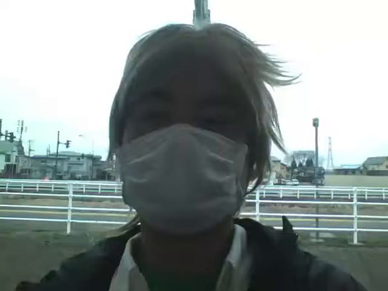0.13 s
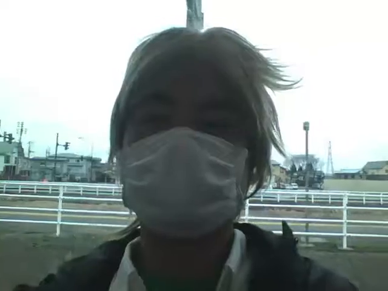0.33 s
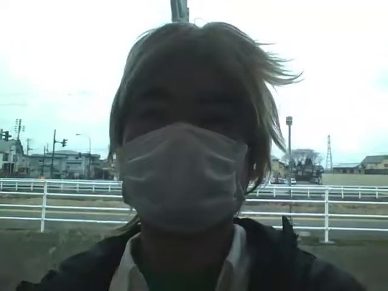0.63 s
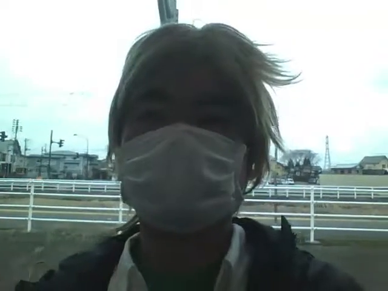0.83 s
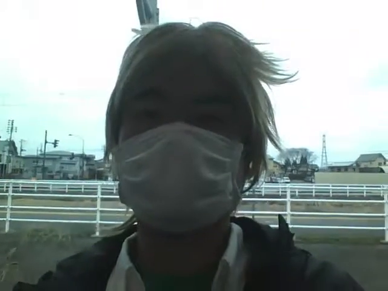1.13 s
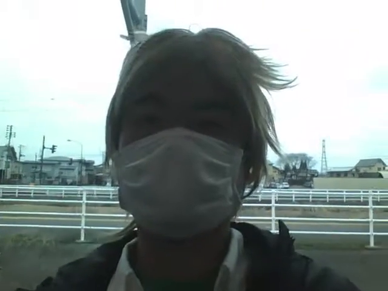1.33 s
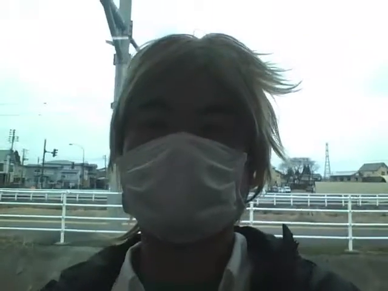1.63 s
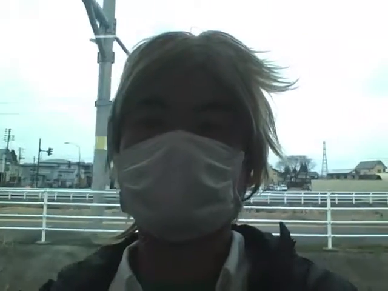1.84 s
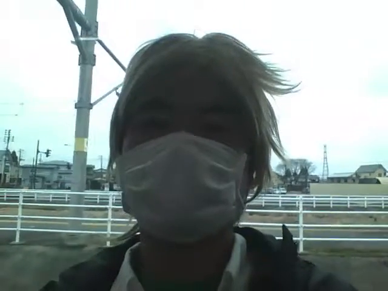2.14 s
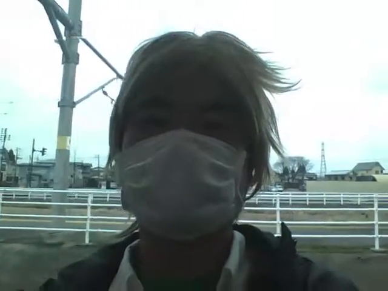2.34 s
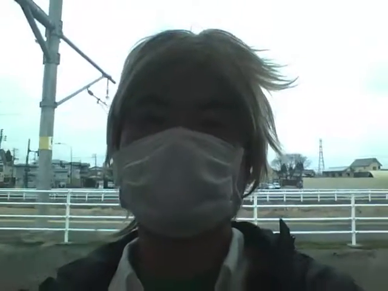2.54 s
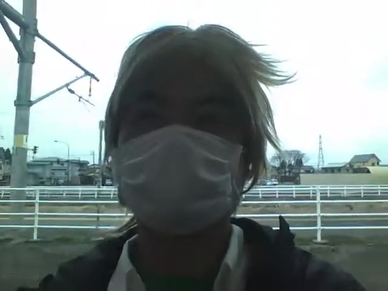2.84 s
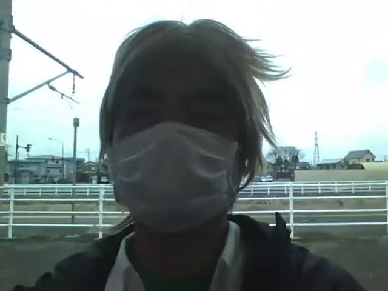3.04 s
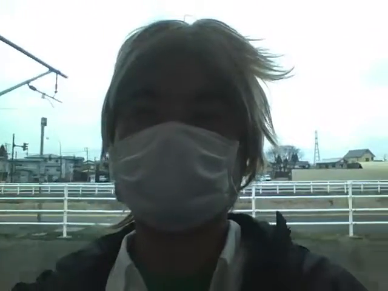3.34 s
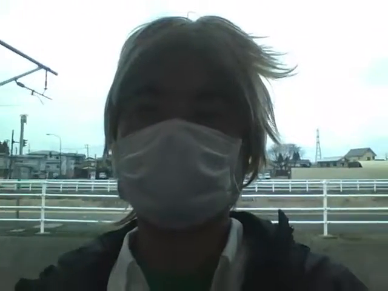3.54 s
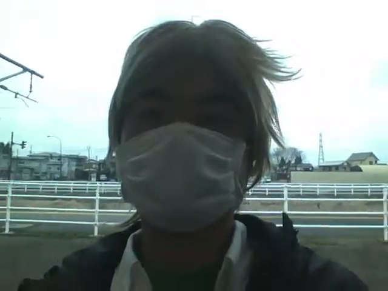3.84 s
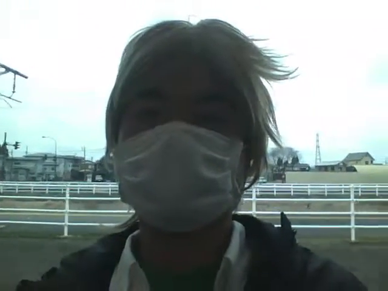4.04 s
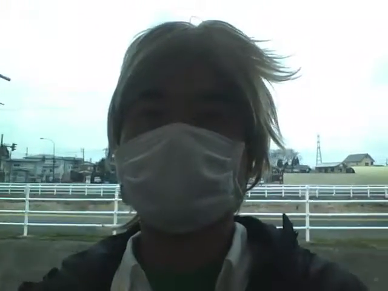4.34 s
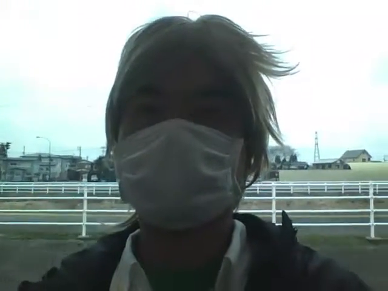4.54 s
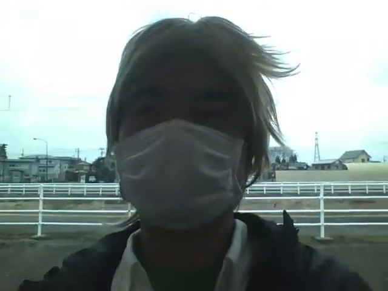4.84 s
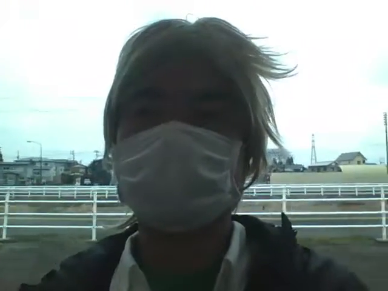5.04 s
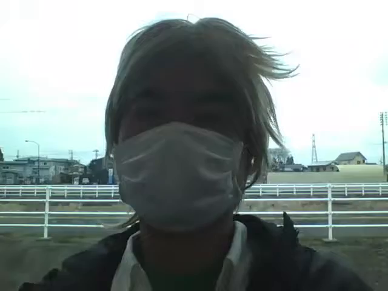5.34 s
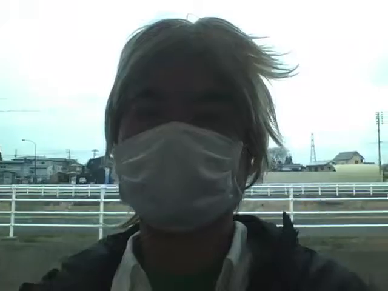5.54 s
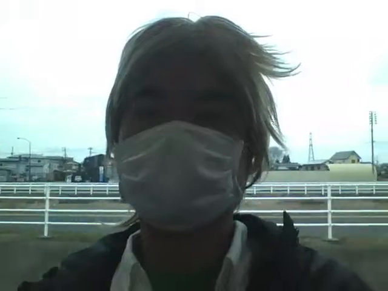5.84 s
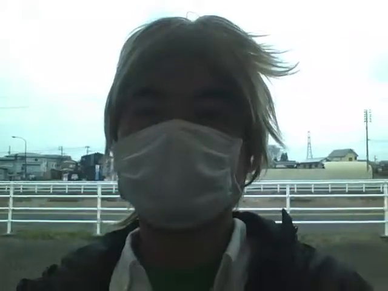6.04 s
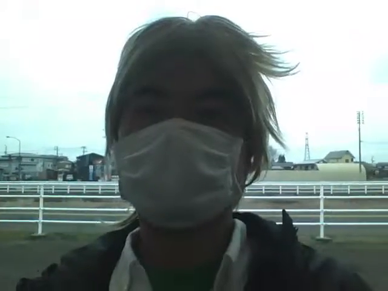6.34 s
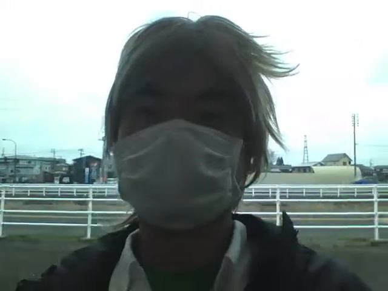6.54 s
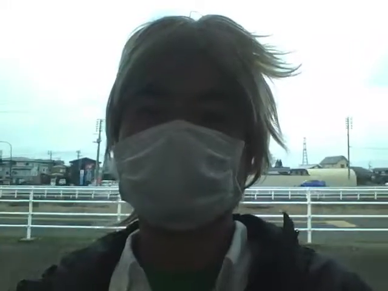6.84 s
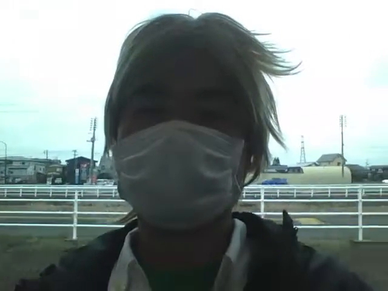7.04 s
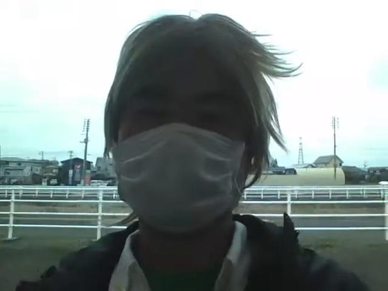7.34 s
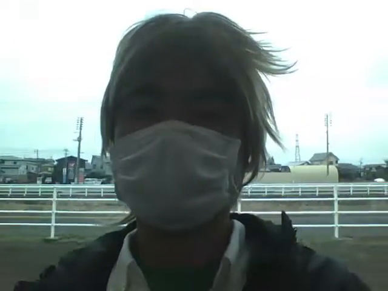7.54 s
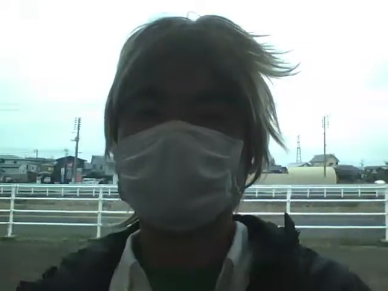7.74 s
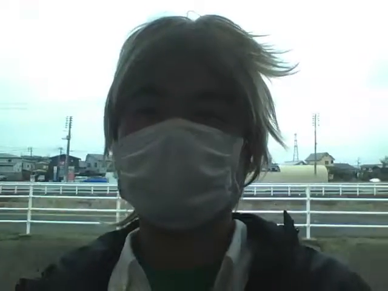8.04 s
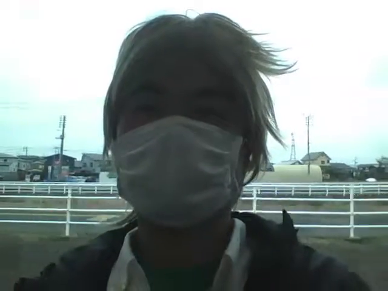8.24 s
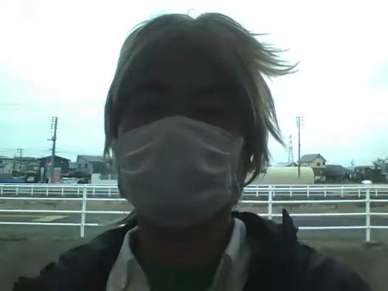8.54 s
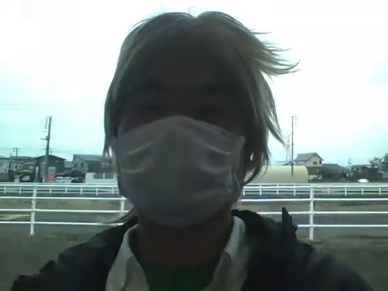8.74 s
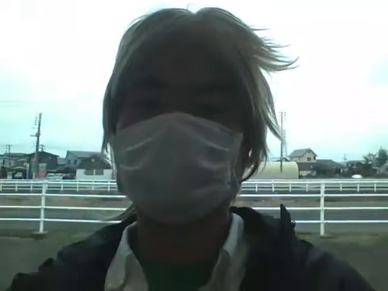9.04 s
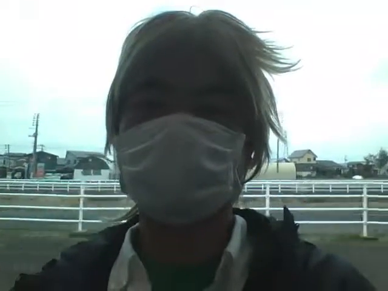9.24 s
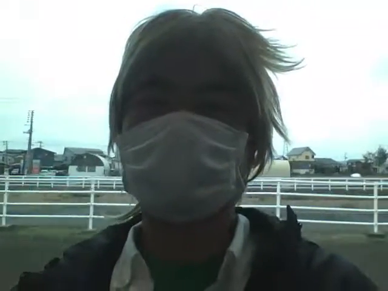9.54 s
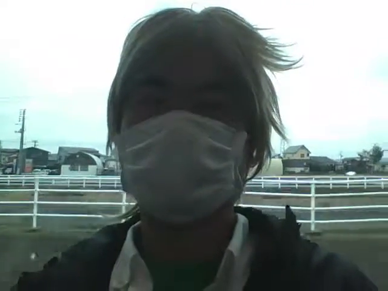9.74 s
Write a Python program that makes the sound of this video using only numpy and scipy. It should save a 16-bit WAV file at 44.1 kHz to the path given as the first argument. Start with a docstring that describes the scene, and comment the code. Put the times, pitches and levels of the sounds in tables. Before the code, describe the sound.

A steady, low, many-toned hum fills a train carriage, heard from inside with soft ventilation hiss. Early on, something small clicks twice beside the microphone, followed by faint ticks and rubs. The hum holds its pitch but turns slightly brighter, with a thin wavering whine, as the wheels rumble louder under the floor. Later the track gives several muffled thuds.

```python
"""Inside a diesel railcar under power, microphone in the cabin. Air hisses evenly in the background.
Wheel rumble swells from below, with a few dull knocks from the track, and something small clicks and
brushes close to the microphone. Over it all the governed engine holds one speed, so its drone is a comb
of steady tones; a thin whine beats slowly against one of them."""
import sys
import numpy as np
from scipy import signal
from scipy.fft import rfft, irfft, next_fast_len
from scipy.io import wavfile

SR = 44100
rng = np.random.default_rng(int(sys.argv[2]) if len(sys.argv) > 2 else 0)


def wrap_up_sound(samples):
    """Save the sound to the file named by the first command line argument, as 16-bit audio."""
    columns = np.atleast_2d(samples).T
    # keep every value between -1 and 1, then stretch to whole-number steps
    tamed = np.clip(columns, -1, 1)
    steps = np.round(tamed * 32767).astype(np.int16)
    wavfile.write(sys.argv[1], SR, steps)


N = 436149
TIME = np.arange(N) / SR

CRANK_HZ, WHINE_HZ = 27.99315, 1600.1
# engine tones that stand out, each on the nearest crank harmonic: (frequency [Hz], level [dB])
ENGINE_TONES = [(112, -25), (252, -27.5), (280, -32.5), (308, -30), (420, -38), (504, -38.5), (560, -40.5),
                (616, -39), (672, -39), (728, -31.5), (812, -45.5), (980, -49.5), (1064, -56), (1148, -47),
                (1204, -48), (1596, -51), (1764, -53.5), (2156, -59), (2296, -55.5)]
# the weaker comb between them, in bass, middle and treble: (frequency [Hz], level per tone [dB])
LOW_COMB = [(28, -40.5), (56, -47), (84, -52), (140, -40.5), (196, -42), (224, -38), (336, -41),
            (364, -53.5), (392, -44), (448, -52.5), (476, -45.5), (640, -49), (756, -54.5), (870, -53)]
MID_COMB = [(900, -62.5), (1300, -61), (1750, -61), (2050, -66), (2450, -66.5), (2720, -69), (2850, -69.5),
            (3200, -71), (3600, -76), (4000, -75.5), (4400, -84), (4750, -73.5), (5500, -81), (7100, -88)]
TOP_COMB = [(8000, -102), (9000, -94.5), (11200, -91), (12000, -96), (13600, -92.5), (14800, -93)]
# cabin resonances that lift the weaker tones: (frequency [Hz], width [Hz], lift [dB])
CABIN_RESONANCES = [(1275, 63, 9), (1431, 43, 6), (1512, 14, 7.5), (1832, 31, 8.5), (2456, 49, 7.5),
                    (2632, 18, 8.5), (3210, 50, 4), (3380, 33, 5.5), (4790, 40, 3.5)]
# crank harmonics that grow with the load, and by how much
SWELLING_HARMONICS, SWELL_DB = (17, 23, 26, 29, 63, 82), 4.5
# wheel rumble at final speed: (frequency [Hz], relative density [dB])
RUMBLE_SPECTRUM = [(20, -2), (38, 1), (55, -6), (110, 0), (200, -2), (260, -5.5), (340, -9), (430, -15),
                   (700, -17), (1000, -30), (2400, -27), (4000, -47)]
# air and engine hiss in the cabin, and its top end: (frequency [Hz], relative density [dB])
HISS_SPECTRUM = [(25, 7), (80, 4.5), (118, 15), (150, -0.5), (400, 0.5), (690, -1.5), (950, -7),
                 (1600, -6.5), (2100, -11.5), (3200, -10), (4400, -16.5), (4800, -14), (6000, -19),
                 (7100, -27.5)]
TOP_HISS_SPECTRUM = [(6500, -23), (8000, -14), (9000, -3.5), (10200, -1), (11300, 1.5), (11600, -4),
                     (14800, -9)]
# knocks from the track: (time [s], level [dB], pitch [Hz], half-width [s])
TRACK_KNOCKS = [(6.17, -34, 35.8, .035), (6.38, -38, 307, .03), (6.38, -33, 32, .05),
                (6.85, -27, 305, 0.022), (7.08, -38, 36, .035), (9.21, -31, 29.9, .06)]
# clicks close to the microphone: (time [s], level [dB], share of bright ring [0-1])
CLOSE_CLICKS = [(0.494, -29, .2), (.4987, -18, .1), (.5430, -24, .08), (.5446, -24, .03), (1.467, -33, .92),
                (1.5055, -42, .8)]
# their dull and bright modes: (frequency [Hz], level [dB], time to fade 60 dB [s])
DULL_MODES = [(880, -1.5, .012), (2240, -3.5, 0.0075), (3180, -3.5, 0.0068), (4160, -1.5, 0.0045),
              (5100, -13, .005), (12300, -19, .003)]
BRIGHT_MODES = [(5730, 1, 0.0064), (10600, -2, 0.0046)]
# soft rubs close to the microphone: (time [s], level [dB], half-width [s])
CLOSE_RUBS = [(1.445, -53, .015), (1.532, -47.5, .025), (2.48, -53.5, 0.037), (6.88, -53, .035)]
# their colour: (frequency [Hz], relative density [dB])
RUB_SPECTRUM = [(1500, -14), (3000, -3), (5200, 5), (8000, -19), (10800, -8), (14500, -20)]


def from_db(db):
    """Decibels to gain."""
    return 10 ** (np.asarray(db) / 20)


def unit_power(x):
    """Scale to an RMS of 1."""
    return x / np.sqrt(np.mean(x ** 2) + 1e-20)


def at_hz(spectrum, hz):
    """Read a spectrum on a log-frequency axis."""
    knots, level_db = np.transpose(spectrum)
    return np.interp(np.log(hz), np.log(knots), level_db)


def ramp(start_s, length_s):
    """An even rise from 0 to 1 that then holds."""
    return np.clip((TIME - start_s) / length_s, 0, 1)


def swell(at, half_width):
    """A smooth bump in time."""
    return np.exp(-.5 * np.minimum(((TIME - at) / half_width) ** 2, 100))


def hump(hz, centre_hz, width_hz):
    """A smooth bump in frequency, 1 at its centre."""
    return np.exp(-((hz - centre_hz) / width_hz) ** 2)


def drift(rate_hz):
    """Random wander with spread 1."""
    knots = rng.standard_normal(int(N / SR * rate_hz) + 2)
    return unit_power(np.interp(TIME * rate_hz, np.arange(len(knots)), knots))


def band(white, low_hz, high_hz):
    """One band of noise at unit power."""
    band_pass = signal.butter(2, [low_hz, high_hz], "band", fs=SR, output="sos")
    return unit_power(signal.sosfilt(band_pass, white))


def cabin_noise(spectrum, ripple_db=2.5, ripple_hz=45):
    """Unit-power noise of a given colour, rippled by the many resonances of the cabin."""
    size = next_fast_len(N)
    hz = np.maximum(np.arange(size // 2 + 1) * SR / size, 1)
    ripple = np.interp(hz / ripple_hz, np.arange(1024), rng.standard_normal(1024))
    colour = from_db(at_hz(spectrum, hz) + ripple_db * (hz > 800) * ripple)
    low_cut = 1 / (1 + (spectrum[0][0] / 2 / hz) ** 4)
    high_cut = 1 / (1 + (hz / spectrum[-1][0] / 1.05) ** 32)
    shaped = rfft(rng.standard_normal(size)) * colour * low_cut * high_cut
    return unit_power(irfft(shaped, size)[:N])


def ring(contacts, modes):
    """Each contact sets every mode ringing as a dying sine."""
    out = 0
    for k, (hz, level_db, t60) in enumerate(modes):
        decay, step = from_db(-60 / (t60 * SR)), 2 * np.pi * hz / SR
        feedback = [1, -2 * decay * np.cos(step), decay ** 2]
        mode = signal.lfilter([0, np.sin(step)], feedback, contacts + 1e-18)
        out += (-1) ** k * from_db(level_db) * mode
    return out


def air_hiss(turns, throb_db=0.83, firing_db=0.4, flutter_db=0.8):
    """Background hiss that throbs a little with each crank turn and each of its three firings."""
    angle = 2 * np.pi * turns
    pulse_db = throb_db * np.cos(angle) + firing_db * np.cos(3 * angle) + flutter_db * drift(20)
    hiss = from_db(-41) * cabin_noise(HISS_SPECTRUM) + from_db(-64.5) * cabin_noise(TOP_HISS_SPECTRUM)
    return from_db(pulse_db) * hiss


def wheel_rumble(start_speed=0.39, rise_per_s=0.081, final_db=-34.5, doubling_db=11, patchy_db=2.6):
    """Under the floor, rail roughness passes ever faster, so the rumble grows and slides up in pitch."""
    coarse_time = TIME[::441]
    speed = np.minimum(start_speed + rise_per_s * coarse_time, 1)   # share of final speed
    level_db = final_db + doubling_db * np.log2(speed)
    edges = np.geomspace(16, 4096, 17)
    centres = np.sqrt(edges[:-1] * edges[1:])
    power = from_db(at_hz(RUMBLE_SPECTRUM, centres[:, None] / speed)) ** 2 * np.diff(edges)[:, None]
    gains = from_db(level_db) * np.sqrt(power / power.sum(axis=0))
    white, out = rng.standard_normal((2, N)), 0
    for k, gain in enumerate(gains):
        envelope = np.interp(TIME, coarse_time, gain) * from_db(patchy_db * drift(10))
        out += envelope * band(white[k % 2], edges[k], edges[k + 1])
    return out


def track_knocks(wobble=.17):
    """Uneven spots in the track reach the cabin as dull, soft-edged thuds."""
    out = 0
    for at, level_db, hz, half_width in TRACK_KNOCKS:
        cycles = np.cumsum(hz * (1 + wobble * drift(150))) / SR
        out += np.sqrt(2) * from_db(level_db) * swell(at, half_width) * np.sin(2 * np.pi * cycles)
    return out


def close_brushing():
    """Brief, faint rubs beside the microphone, as of cloth or a finger."""
    envelope = sum(from_db(level_db) * swell(at, half_width) for at, level_db, half_width in CLOSE_RUBS)
    return envelope * cabin_noise(RUB_SPECTRUM)


def close_clicks(friction=0.13, friction_s=0.0014):
    """Hard little contacts at close range: a snap and a trace of friction excite short modes."""
    dull, bright = np.zeros((2, N))
    age = TIME[:400]
    snap = age == 0
    for at, level_db, bright_share in CLOSE_CLICKS:
        contact = snap + friction * rng.standard_normal(len(age)) * np.exp(-age / friction_s)
        span = slice(round(at * SR), round(at * SR) + len(age))
        dull[span] += from_db(level_db) * (1 - bright_share) * contact
        bright[span] += from_db(level_db) * bright_share * contact
    return ring(dull, DULL_MODES) + ring(bright, BRIGHT_MODES)


def whine(full_db=-45.5, rise_db=13, halo_db=-56):
    """A thin, swelling tone in a halo of noise, a few hertz from an engine tone, so the two beat."""
    level_db = full_db - rise_db * (1 - ramp(start_s=0, length_s=5))
    tone = np.sqrt(2) * from_db(level_db) * np.sin(2 * np.pi * WHINE_HZ * TIME)
    return tone + from_db(halo_db) * band(rng.standard_normal(N), 1556, 1624)


def engine_drone(turns, scatter_db=2.5, growth_db=0.5, shift_db=3.5, clatter_db=5.5):
    """Each crank turn fills the cabin with one pressure wave, whose colour shifts as the load builds."""
    count, size = 530, 8192   # harmonics, samples per turn
    harmonic = np.arange(1, count + 1)
    hz = harmonic * CRANK_HZ
    phase = np.exp(2j * np.pi * rng.random(count))
    uneven = hz > LOW_COMB[-1][0]   # above the bass, the cabin favours some tones by chance
    level_db = at_hz(LOW_COMB + MID_COMB + TOP_COMB, hz)
    level_db += uneven * scatter_db * rng.standard_normal(count)
    level_db += sum(lift_db * hump(hz, centre, width) for centre, width, lift_db in CABIN_RESONANCES)
    for tone_hz, tone_db in ENGINE_TONES:
        nearest = np.argmin(abs(hz - tone_hz))
        level_db[nearest], uneven[nearest] = tone_db, False
    change_db = uneven * (growth_db + shift_db * rng.standard_normal(count))   # light to full load
    change_db += SWELL_DB * np.isin(harmonic, SWELLING_HARMONICS)
    change_db += clatter_db * hump(hz, centre_hz=2360, width_hz=370)   # combustion clatter grows too
    waves = []
    for tones_db in (level_db - change_db / 2, level_db + change_db / 2):
        cycle = irfft(np.r_[0, from_db(tones_db) * phase], size) * size / np.sqrt(2)
        waves.append(np.interp(turns, np.arange(size) / size, cycle, period=1))
    light, full = waves
    load = ramp(start_s=0.9, length_s=7.1)
    return (1 - load) * light + load * full


def scene():
    """The cabin from one spot, in mono; the slightly unsteady crank drives both drone and hiss."""
    turns = CRANK_HZ * TIME + .0001 * drift(30)
    engine = engine_drone(turns) + whine()
    background = air_hiss(turns) + wheel_rumble() + track_knocks()
    return (engine + background + close_clicks() + close_brushing())[None]


def record(dry, open_s=.08, cutoff_hz=14880):
    """The microphone opens after a moment; the top is cut steeply."""
    low_pass = signal.ellip(12, .1, 90, cutoff_hz, fs=SR, output="sos")
    return signal.sosfilt(low_pass, dry * (TIME >= open_s))


dry = scene()
out = record(dry)
wrap_up_sound(out)
```